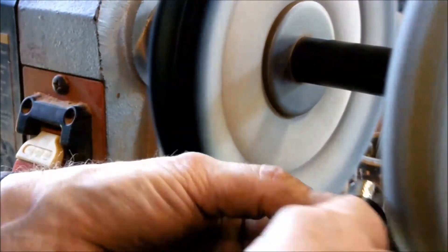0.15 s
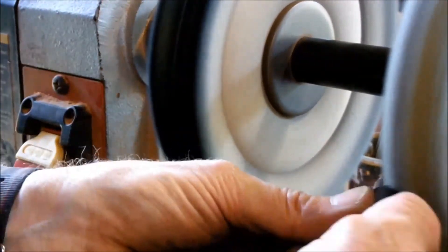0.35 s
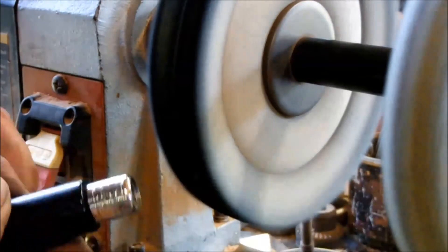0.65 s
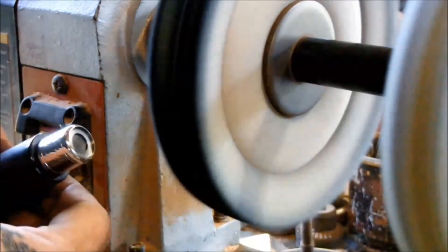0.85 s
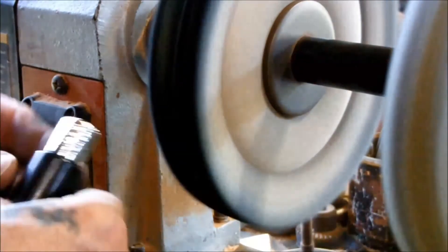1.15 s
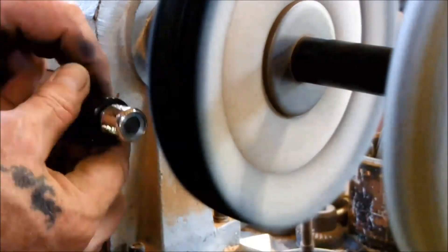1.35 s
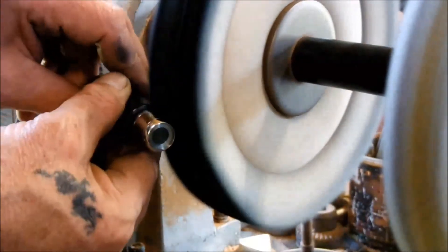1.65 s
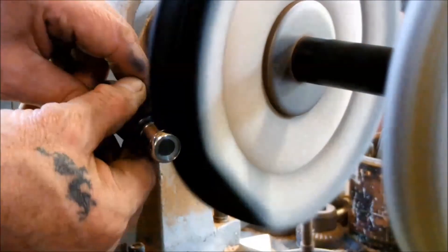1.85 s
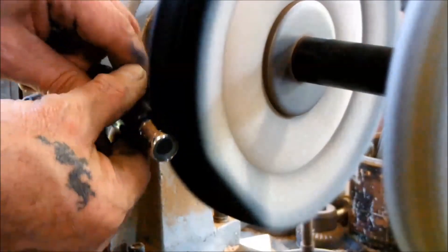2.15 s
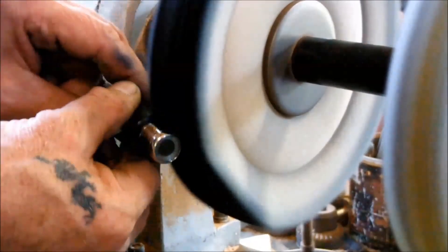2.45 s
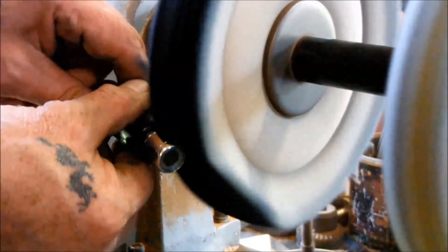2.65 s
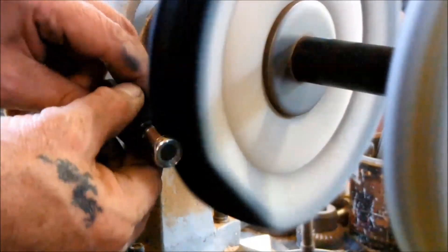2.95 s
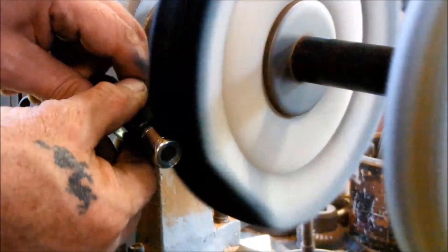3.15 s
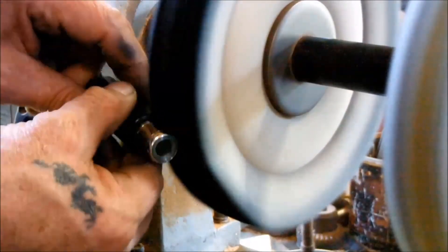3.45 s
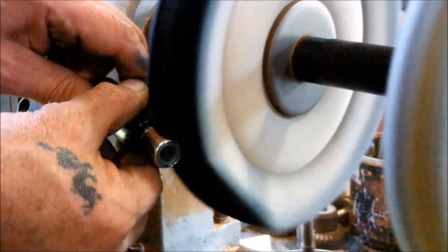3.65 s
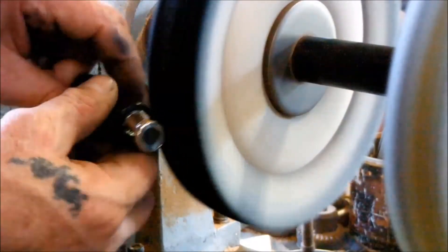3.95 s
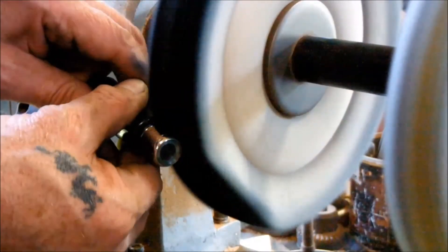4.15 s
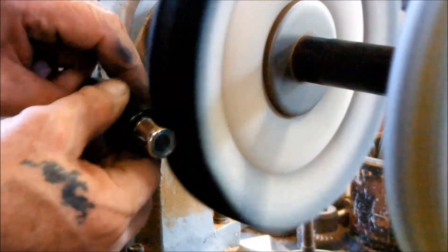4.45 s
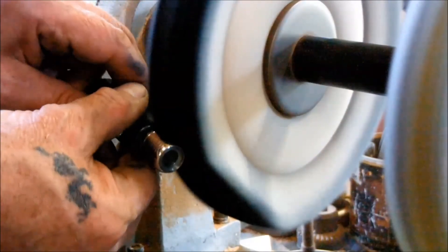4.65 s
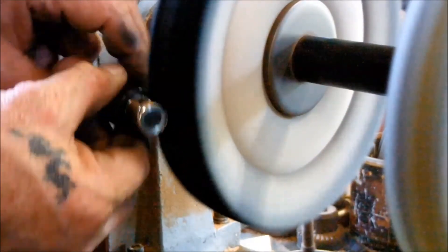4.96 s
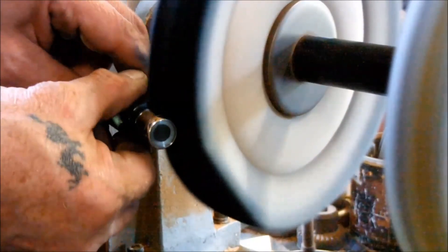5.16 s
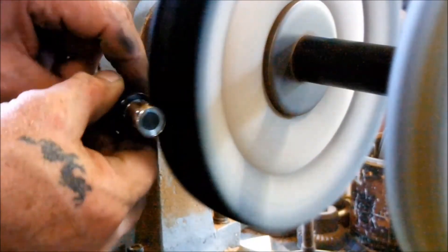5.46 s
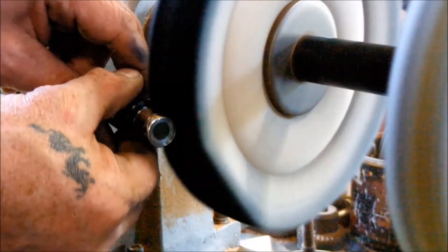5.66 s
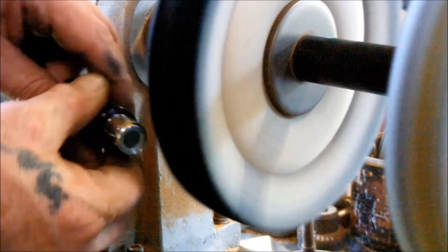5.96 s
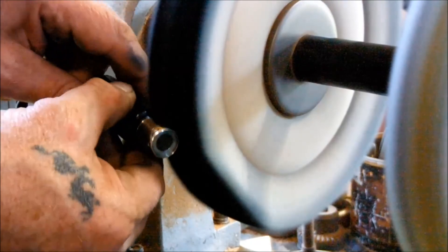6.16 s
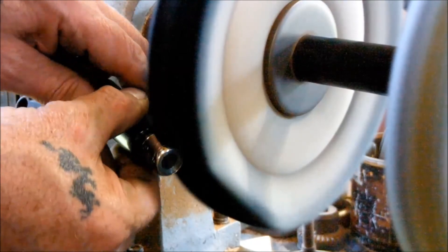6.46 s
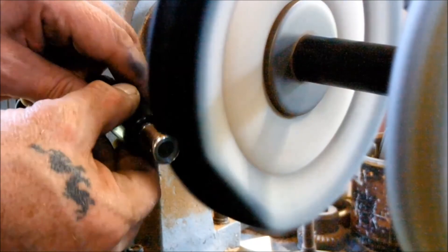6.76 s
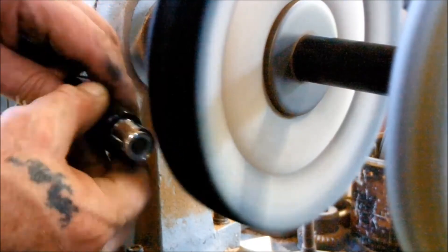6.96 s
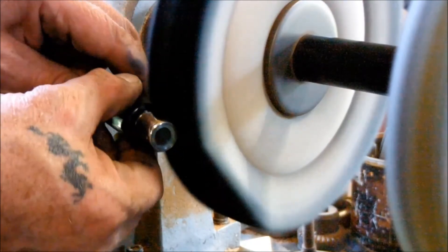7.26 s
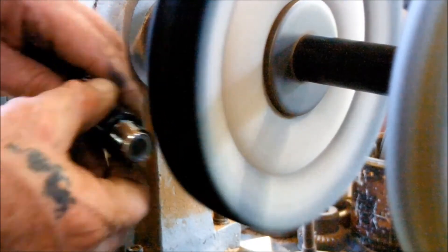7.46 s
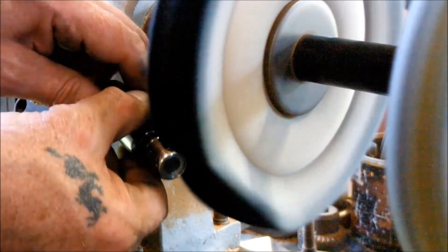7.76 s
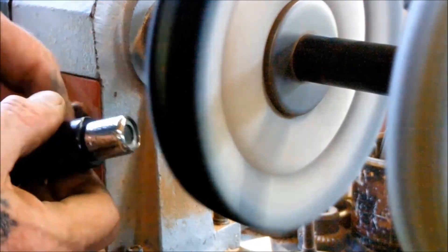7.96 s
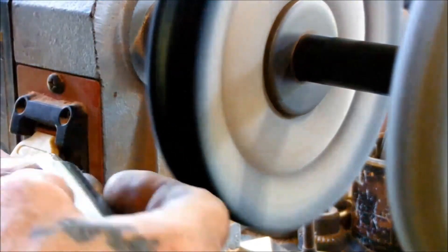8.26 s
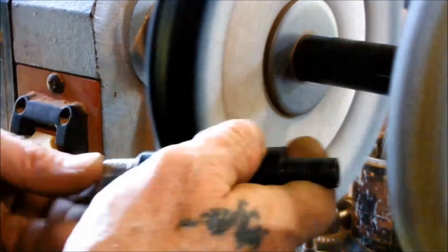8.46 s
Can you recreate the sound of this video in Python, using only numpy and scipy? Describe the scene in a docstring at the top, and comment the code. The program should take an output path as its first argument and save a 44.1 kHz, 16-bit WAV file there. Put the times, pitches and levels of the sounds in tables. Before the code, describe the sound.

A buffing machine runs close by in a workshop, with thin, bright, many-toned whine over mains hum and rushing fan air. Two light touches squeal at the start, then fingers rustle, knock and squeak as the piece is turned. From about 1.6 seconds, repeated presses dip the pitch and add buzz and hiss, each followed by a quick recovery. Close, dry, centred microphone.

```python
"""Buffing wheel under repeated presses

An electric buffing machine whines close by; a small wooden piece is pressed on its cloth wheel again and again.
Each press drags the speed down: the toothed drive's whine, made of speed-locked sines, slides through the
housing's resonances, a loaded bearing buzzes in an uneven comb and the cloth hisses as coloured noise.
Steady mains lines and shaped fan noise lie underneath; fingers rub, knock as decaying clusters of sines
and squeak as short glides on the piece while it is turned round."""
import sys
import numpy as np
from scipy import signal
from scipy.fft import rfft, irfft, next_fast_len
from scipy.io import wavfile
from scipy.ndimage import map_coordinates

SR = 44100
rng = np.random.default_rng(int(sys.argv[2]) if len(sys.argv) > 2 else 0)


def unload_audio(sound):
    """Save the sound as a 16-bit wav file, at the path given as the first command line argument."""
    columns = np.transpose(np.atleast_2d(sound))
    # keep every value between -1 and 1, then stretch to whole-number steps
    steps = np.round(np.clip(columns, -1, 1) * 32767)
    wavfile.write(sys.argv[1], SR, steps.astype(np.int16))


N = 379252

IDLE_HZ = 591.7  # tooth rate of the unloaded drive
TEETH = 16  # on the pinion
BALLS_PER_TOOTH = 107.03 / 591.7  # ball passes per tooth
FLUTTER_PER_TOOTH = 44.6 / IDLE_HZ  # cycles of speed flutter per tooth
TOP_HZ = 15760  # upper band limit

# housing resonances, and the hollows between the high ones: (centre [Hz], width [Hz], lift [dB])
HOUSING = [(2124, 120, 3.5), (2800, 77, 8), (6936, 59, 9.5), (8650, 340, 4.5), (12180, 430, 5.5),
           (13040, 400, -3.5), (13550, 720, 7), (14230, 200, 1.5), (14550, 320, -4.5), (15300, 160, 5),
           (15700, 780, 2)]
# the piece is pressed on the wheel, slowing given ahead of the inertia:
# (start [s], time to bite [s], let go [s], slowing at the bite [Hz], slowing before easing [Hz])
PRESSES = [(-0.065, 0.115, 0.16, 6.8, 11.0), (0.239, 0.108, 0.467, 11.7, 12.3),
           (1.627, 0.27, 2.03, 38.9, 12.0), (1.896, 0.116, 2.261, 6.0, 26.1),
           (2.404, 0.191, 2.761, 44.3, 52.4), (2.891, 0.084, 3.368, 26.1, 37.0),
           (3.471, 0.079, 3.909, 21.2, 40.8), (4.01, 0.2, 4.378, 41.2, 26.8),
           (4.479, 0.174, 4.919, 42.2, 33.2), (5.012, 0.055, 5.382, 8.4, 32.2),
           (5.488, 0.256, 5.974, 23.8, 23.9), (6.104, 0.142, 6.538, 25.5, 33.6),
           (6.644, 0.11, 6.97, 22.9, 37.2), (7.09, 0.153, 7.481, 22.9, 36.0),
           (7.61, 0.096, 7.864, 21.9, 41.0)]


def amp(db):
    """Decibels to amplitude ratio: 20 dB for each factor of ten."""
    return 10 ** (np.asarray(db) / 20)


def unit(x):
    """Normalisation to rms 1."""
    return x / np.sqrt(np.mean(x ** 2) + 1e-20)


def along(points, hz):
    """Interpolation of (frequency [Hz], value) points on a logarithmic frequency axis."""
    f, v = np.transpose(points)
    return np.interp(np.log(hz + 1), np.log(f + 1), v)


def curve(rows):
    """Linear interpolation of (time [s], value) rows to one value per sample."""
    return np.interp(np.arange(N) / SR, *np.transpose(rows))


def gate(start, end, rise, fall):
    """Trapezoidal envelope of rise, hold and fall, all in seconds."""
    t = np.arange(N) / SR
    return np.clip(np.minimum((t - start) / rise, (end - t) / fall), 0, 1)


def wobble(rate, size=64):
    """Smooth random control: a spline through rate random knots a second, one value in size samples."""
    knots = rng.standard_normal(int(N * rate / SR) + 4)
    return map_coordinates(knots, [np.arange(0, N, size) * rate / SR])


def stretch(x, size=64):
    """Linear interpolation of a coarse control, one value in size samples, to one value per sample."""
    return np.interp(np.arange(N), np.arange(len(x)) * size, x)


def filtered(x, response):
    """Linear filtering: the spectrum of x times a response of frequency."""
    m = next_fast_len(N + 8192)
    return irfft(rfft(x, m) * response(np.fft.rfftfreq(m, 1 / SR)), m)[:N]


def noise(spectrum):
    """Coloured noise of rms 1: white noise shaped by (frequency [Hz], relative density [dB]) points."""
    return unit(filtered(rng.standard_normal(N), lambda hz: amp(along(spectrum, hz))))


def tone(cycles):
    """Sine of rms 1 from its phase in cycles."""
    return np.sqrt(2) * np.sin((2 * np.pi * (cycles - np.floor(cycles))).astype(np.float32))


def housing(hz, resonances=HOUSING):
    """Resonance: the summed Lorentzian lift in dB at each frequency."""
    return sum(db / (1 + (2 * (hz - centre) / width) ** 2) for centre, width, db in resonances)


def motor():
    """Steady excitation: mains harmonics, a low stand drone, faint tones, fan turbulence and an early whirr."""
    # mains lines before their swell and wavering: (frequency [Hz], level [dB])
    hum_lines = [(120, -78), (240, -60.5), (360, -60.5), (480, -43.5), (960, -42.5), (1440, -48)]
    # gain of the hum: (time [s], gain [dB])
    hum_swell = [(0, -6), (1.3, -1), (2.2, -2), (4.2, -1), (8.6, -0.5)]
    # the stand's low drone: (time [s], level [dB])
    drone_level = [(0, -60), (1.5, -59.5), (1.9, -54.5), (2.45, -59), (2.85, -69), (3.5, -67), (3.85, -58),
                   (4.5, -54.5), (5.1, -62), (5.45, -56.5), (7.8, -56), (8.6, -60)]
    # faint wavering tones beside the hum: (frequency [Hz], level [dB])
    faint_lines = [(452, -53), (640, -51.5), (1424, -51)]
    # a whirr that falls to a trace within the first second: (frequency [Hz], level before the fall [dB])
    whirr_lines = [(818.3, -40), (925.9, -42), (958.2, -41), (979.8, -41), (1141, -43)]
    # fan and wheel air: (frequency [Hz], relative density [dB])
    air_colour = [(24, -75), (40, -29), (113, -26), (160, -17.5), (307, -19), (411, -9), (473, -3.5),
                  (543, -10), (624, -2), (775, -3.5), (947, -1), (1040, -5.5), (1600, -7.5), (2080, -29),
                  (3520, -120)]
    # hollow resonances in the rush of air: (centre [Hz], width [Hz], lift [dB])
    air_peaks = [(715, 26, 4.5), (843, 32, 5.5)]

    t = np.arange(N) / SR
    hum = sum(stretch(amp(db + 1.2 * wobble(7))) * tone(hz * t + rng.random()) for hz, db in hum_lines)
    hum = hum * amp(curve(hum_swell))
    drone = amp(curve(drone_level)) * tone(167 * t + .02 * stretch(wobble(8)))
    faint = sum(amp(db) * tone(hz * t + 0.14 * stretch(wobble(9))) for hz, db in faint_lines)
    whirr = sum(amp(db) * tone(hz * t + rng.random() + .03 * stretch(wobble(15))) for hz, db in whirr_lines)
    whirr = whirr * curve([(.78, 1), (.86, 0.035)])
    air = unit(filtered(noise(air_colour), lambda hz: amp(housing(hz, air_peaks))))
    air = air * amp(-39.0 + 0.78 * stretch(wobble(12)))
    return hum + drone + faint + whirr + air


def slowing(presses):
    """Inertia: the drop of the tooth rate [Hz] follows each bite, lean, ease and lift-off with first-order lag."""
    # before letting go the hand eases to this share of its push, then lifts off
    ease_s, ease_share, lift_s = .0444, .882, .0218
    inertia_s = .0061  # time constant of the lag
    push = 0
    for start, bite, end, first, last in presses:
        push = push + curve([(start, 0), (start + bite, first), (end - ease_s, last),
                             (end - lift_s, ease_share * last), (end, 0)])
    keep = np.exp(-1 / (inertia_s * SR))
    return signal.lfilter([1 - keep], [1, -keep], push)


def squealing():
    """Power law of friction squeal: only light touches raise it, the more as they slow the drive."""
    light_touch_hz = 15  # presses that slow the drive less than this are light
    squeal_db, growth_power = -19.5, 1.3  # level at that limit; power of the slowing
    light = [press for press in PRESSES if max(press[-2:]) < light_touch_hz]
    return amp(squeal_db) * (slowing(light) / light_touch_hz) ** growth_power


def partial(multiple, start, teeth, speed, load, free_db, loaded_db, waver_db, size=64):
    """Order tracking: a line locked to the drive, set by load and coloured by the housing as it slides."""
    rate, push = speed[::size], load[::size]
    strength = (1 - push) * amp(free_db) + push * amp(loaded_db)
    waver = waver_db * (0.23 + 0.24 * push) * wobble(14)
    level = strength * amp(housing(multiple * rate) + waver)
    return stretch(level) * tone(multiple * teeth + start)


def drive(teeth, speed, load):
    """Phase modulation: an off-centre pinion with uneven teeth swings the mesh phase and fringes the high lines."""
    # drive whine before treble lift and housing:
    # (tooth harmonic, sideband at idle [Hz], free level [dB], loaded level [dB])
    whine = [(2, 0, -53.5, -47), (3, -43.5, -49, -47), (3, 4, -37.5, -55), (3, 44.5, -44, -67),
             (4, -44.5, -38, -38.5), (4, 0.5, -50, -34.5), (4, 43.5, -47, -49), (5, -43, -45, -44),
             (5, 1, -30.5, -36), (5, 47, -71, -52), (6, -47.5, -47, -41), (6, 0, -43.5, -43.5),
             (7, -47.5, -49, -57), (7, -1, -31, -34.5), (7, 36.5, -72, -60), (8, -43.5, -56, -45.5),
             (11, 1.5, -36, -38), (11, 44.5, -56, -52.5), (12, -44.5, -34, -52), (12, 0, -37.5, -44),
             (12, 43, -39.5, -45), (13, -41.5, -33.5, -45), (13, 2.5, -41.5, -38), (14, -169, -49, -41),
             (14, -45, -60, -35.5), (14, 5, -41, -47), (14, 44.6, -33.5, -41.5), (15, -44.5, -34.5, -46),
             (15, 1.5, -42, -41.5), (15, 45, -29, -35.5), (16, -44.6, -36, -37.5), (16, -2.5, -38, -45),
             (16, 45, -42, -41), (16, 165, -44, -51), (17, -46, -60, -39), (17, 43, -38, -41),
             (18, 47, -42.5, -54), (19, -44, -45, -55), (19, -0.5, -42, -61), (20, -42, -58, -38.5),
             (21, -43, -35, -42), (21, 0, -47, -48), (22, -169, -40, -42), (22, -45, -62, -37.5),
             (22, 2.5, -62, -43), (22, 44.5, -37, -62), (23, -45, -35, -36), (23, -1.5, -44.5, -38.5),
             (23, 45, -40, -38), (24, -44.5, -62, -39), (24, -0.5, -46, -51), (24, 43, -32, -37),
             (24, 164, -32, -62), (25, -44.5, -37, -45), (25, -2.5, -34, -41), (25, 43, -43, -46),
             (26, -42, -62, -48), (26, 0, -33, -33), (26, 46, -28, -40), (27, -45, -60, -37),
             (27, 1, -60, -43), (27, 44.6, -60, -40), (27, 167, -60, -45)]
    # the free wheel rings out high: (start [s], end [s], level [dB])
    rings = [(.5, 1.36, -32), (8.05, 8.7, -39)]
    ring_rise_s, ring_fall_s = 0.22, 0.073
    groan_db, groan_from_hz, groan_full_hz = -22.5, 36, 52  # slowing at which it starts and is full
    lift_db = 4  # proportional to frequency, this much at the band limit

    errors = np.resize(unit(rng.standard_normal(TEETH)), TEETH + 1)
    spacing = np.interp(teeth % TEETH, np.arange(TEETH + 1), errors)
    off_centre = np.sin(2 * np.pi * teeth / TEETH)
    phase = teeth + .006 * off_centre + .0008 * spacing
    starts = rng.random(size=32)

    squeal = squealing()
    out = squeal * tone(12 * phase)
    # the hardest presses make the fourth tooth line groan
    groan_share = np.interp(IDLE_HZ - speed, [groan_from_hz, groan_full_hz], [0, 1])
    out = out + amp(groan_db) * groan_share * tone(4 * phase + starts[4])
    # the sixteenth line rings out, beating with the flutter
    flutter = np.sqrt(2) * np.sin(2 * np.pi * teeth * FLUTTER_PER_TOOTH)
    beat = flutter * tone(16 * phase + starts[16] + .25)
    out = out + beat * sum(amp(db) * gate(start, end, ring_rise_s, ring_fall_s) for start, end, db in rings)

    # a light touch that squeals also damps the lower lines and the twelfth with its sidebands
    damped = 1 / (1 + squeal / amp(-18))
    for k, side, free, loaded in whine:
        k = round(k)
        # sidebands come from speed flutter, so the lower ones are inverted
        start = starts[k] + .5 * (side < 0)
        lift = lift_db * k * IDLE_HZ / TOP_HZ
        line = partial(k + side / IDLE_HZ, start, phase, speed, load, free + lift, loaded + lift, waver_db=3.5)
        out += line * damped if k < 8 or k == 12 else line
    return out


def bearing(teeth, speed, load):
    """Ball-pass harmonics: strong lines stand in an even comb whose other teeth rise from near silence under load."""
    # strong lines before the housing: (ball-pass harmonic, free level [dB], loaded level [dB])
    strong_lines = [(16, -42, -44), (17, -37, -42), (18, -41, -43), (25, -56, -44), (26, -62, -41),
                    (27, -56, -39), (28, -50, -44), (31, -62, -37), (33, -45, -39), (35, -59, -42),
                    (36, -57, -38), (39, -41, -45), (61, -44, -39), (66, -42, -38), (67, -41, -42),
                    (69, -56, -44), (72, -62, -41)]
    uneven = teeth + 0.004 * stretch(wobble(40))
    comb = {k: (-70, -45) for k in range(20, 41)}  # free and loaded dB
    comb.update({int(k): (free, loaded) for k, free, loaded in strong_lines})
    return sum(partial(k * BALLS_PER_TOOTH, rng.random(), uneven, speed, load, free, loaded, waver_db=7.5)
               for k, (free, loaded) in comb.items())


def hiss(teeth, load):
    """Rolling and rubbing noise: part of the roughness is periodic, returning with every turn of the pinion."""
    # free-running drive, before housing and low cut: (frequency [Hz], density [dB per Hz])
    running_colour = [(1550, -73), (2000, -58.5), (2550, -73), (3300, -66.5), (4300, -68), (5200, -68),
                      (6300, -65.5), (7300, -65), (8100, -63.5), (9400, -62), (10200, -64), (11500, -62.5),
                      (13000, -61.5), (15600, -57.5)]
    # piece on the cloth, before housing and low cut: (frequency [Hz], density [dB per Hz])
    rubbing_colour = [(1550, -67.5), (2000, -64), (2550, -70), (3300, -64.5), (4300, -65.5), (5200, -65.5),
                      (6300, -61.5), (7300, -59), (8100, -60.5), (9400, -62.5), (10200, -63.5),
                      (11500, -59.5), (13000, -59.5), (15600, -57)]

    points = 1190  # random heights round the pinion
    track = signal.resample(rng.standard_normal(points), 8 * points)
    worn = unit(track[(teeth / TEETH % 1 * len(track)).astype(int)])
    rolling = unit(0.57 * worn + rng.standard_normal(N))
    # under load the noise comes in bursts, one for each passing ball
    bursts_db = 1.3 * np.sin(2 * np.pi * teeth * BALLS_PER_TOOTH) + 0.77 * stretch(wobble(60))
    rubbing = unit(rng.standard_normal(N) * amp(bursts_db))

    def coloured(x, colour):
        """Spectral shaping: density, housing and a low cut at 1250 Hz."""
        def response(hz):
            low_cut = hz ** 4 / (hz ** 4 + 1250 ** 4)
            # white noise of rms 1 spreads its power over SR / 2
            return amp(along(colour, hz) + housing(hz)) * np.sqrt(SR / 2) * low_cut
        return filtered(x, response)

    # the shares add in power
    return np.sqrt(1 - load) * coloured(rolling, running_colour) + np.sqrt(load) * coloured(rubbing, rubbing_colour)


def hands():
    """Friction and impact: skin rustles as noise, knocks as damped modes and squeaks by stick-slip."""
    # hands slide on the piece as it is turned round: (start [s], end [s], level [dB])
    rubs = [(-.03, 0.174, -34), (.23, .31, -32.5), (0.306, 0.576, -38.5), (0.626, .79, -36.5),
            (0.812, 1.04, -37), (1.02, 1.234, -34), (1.497, 1.8, -42.5)]
    # rustle of skin: (frequency [Hz], relative density [dB])
    skin_colour = [(24, -65), (40, -35), (361, -6), (758, -3), (793, -16), (869, 2.5), (952, -6),
                   (1040, -5.5), (1500, -7.5), (1950, -38), (3300, -120)]
    # fingers on the piece: (time [s], level before onset and decay [dB], reference frequency [Hz])
    knocks = [(0.026, -27, 555), (0.077, -35, 676), (0.333, -26, 328), (0.415, -22.5, 510),
              (0.672, -33, 403), (0.96, -35, 450), (1.167, -34, 320), (1.455, -32, 465), (1.655, -37, 440),
              (2.567, -34, 480), (3.069, -28.5, 540)]
    # finger squeaks on the polish: (time [s], length [s], start [Hz], end [Hz], level at the middle [dB])
    squeaks = [(1.27, 0.043, 1180, 700, -26), (1.417, 0.062, 1090, 917, -27.5),
               (5.302, 0.037, 1050, 940, -32)]

    rub_rise_s, rub_fall_s = 0.021, 0.03
    sliding = sum(amp(db) * gate(start, end, rub_rise_s, rub_fall_s) for start, end, db in rubs)
    out = np.pad(sliding * noise(skin_colour), (0, SR))  # room for tails

    t = np.arange(SR // 8) / SR
    for s, db, hz in knocks:
        ratios = np.geomspace(.45, 2, 9) * rng.uniform(.92, 1.08, 9)
        ring = sum(tone(hz * ratio * t + rng.random()) for ratio in ratios)
        onset = (1 - np.exp(-t / .003)) ** 2
        decay = amp(db - 60 * t / .08)  # 60 dB in 0.08 s
        out[round(s * SR):][:len(t)] += decay * onset * unit(ring)

    for s, length, start_hz, end_hz, db in squeaks:
        glide = np.linspace(start_hz, end_hz, round(length * SR))
        # the skin sticks and slips unevenly
        slips = 0.14 * stretch(wobble(277))[:len(glide)]
        squeak = np.hanning(len(glide)) * tone(np.cumsum(glide) / SR + slips)
        out[round(s * SR):][:len(glide)] += amp(db) * squeak
    return out[:N]


def rattle(teeth, load):
    """Amplitude modulation: with nothing on the wheel the slack drive rattles in step with the speed flutter."""
    # slack drive: (frequency [Hz], relative density [dB])
    rattle_colour = [(1750, -60), (1900, -19), (2040, 18), (2130, -19), (2250, -60)]
    flutter = np.sin(2 * np.pi * teeth * FLUTTER_PER_TOOTH)
    throb_db = 4 * flutter + 2.0 * stretch(wobble(99))
    return (1 - load) * amp(-41) * unit(noise(rattle_colour) * amp(throb_db))


def scene():
    """Superposition: presses slow and load the machine; hum and hands sound beside it, alike in both channels."""
    # gain of the treble: (time [s], gain [dB])
    treble_gain = [(0, 0), (.7, 2), (1.5, 2.1), (4, 1.5), (8.6, 2)]
    slack_hz, full_load_hz = 0.35, 17.6  # slowing that takes up the slack; further slowing to full load
    sag = slowing(PRESSES)
    speed = IDLE_HZ - sag
    teeth = np.cumsum(speed) / SR  # teeth passed so far
    load = np.clip((sag - slack_hz) / full_load_hz, 0, 1)
    machine = drive(teeth, speed, load) + bearing(teeth, speed, load) + hiss(teeth, load) + rattle(teeth, load)
    # the treble swells and fades a little
    treble = filtered(machine, lambda hz: hz ** 4 / (hz ** 4 + 8000 ** 4))
    mono = machine + (amp(curve(treble_gain)) - 1) * treble + motor() + hands()
    return np.array([mono, mono])


def record(dry):
    """Band limitation: nothing passes at or above the upper limit."""
    return np.array([filtered(x, lambda hz: hz < TOP_HZ) for x in dry])


dry = scene()
out = record(dry)
unload_audio(out)
```